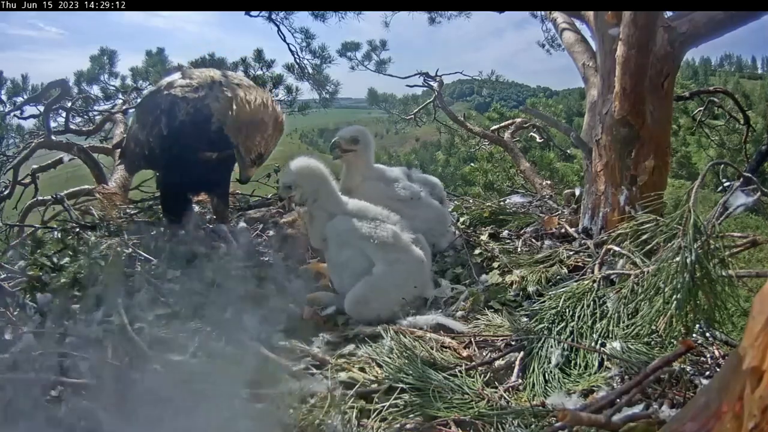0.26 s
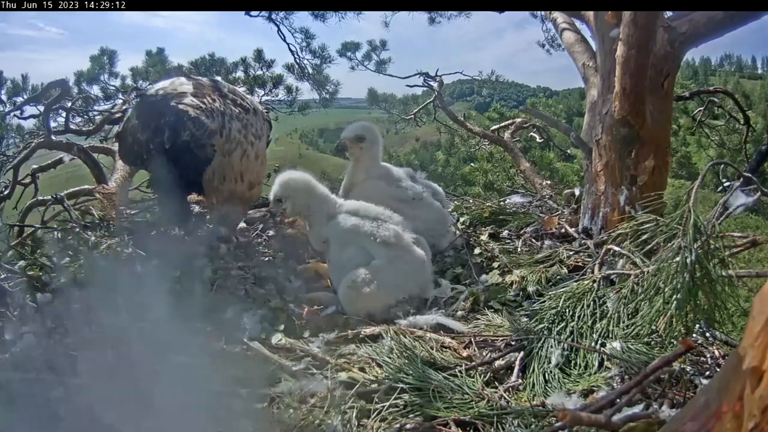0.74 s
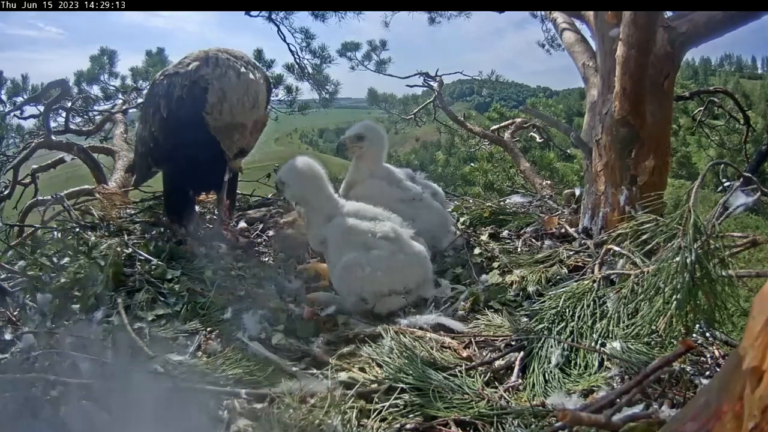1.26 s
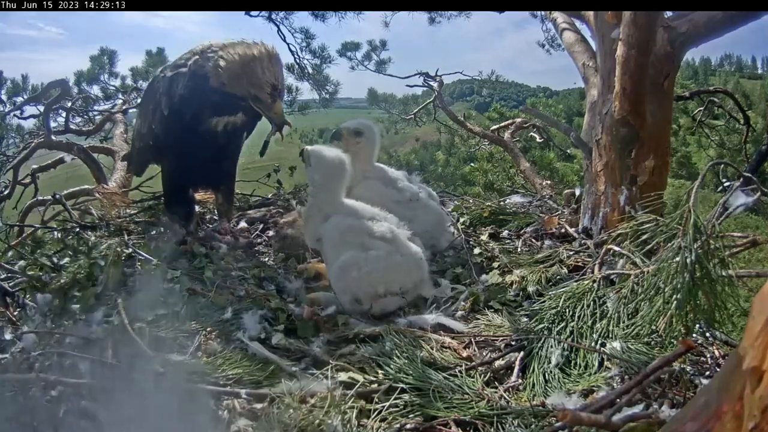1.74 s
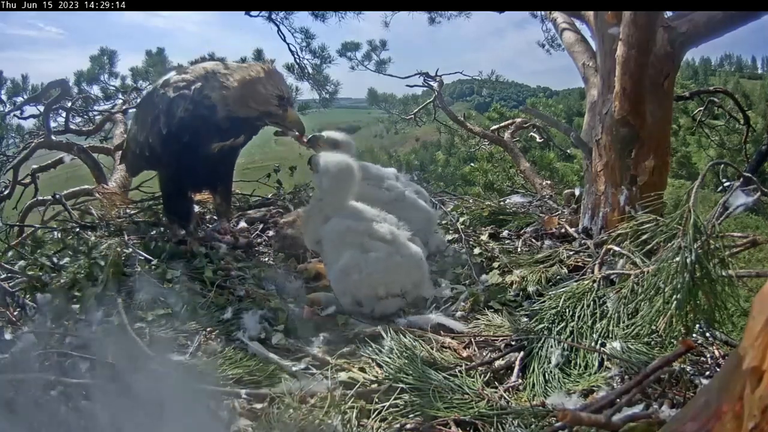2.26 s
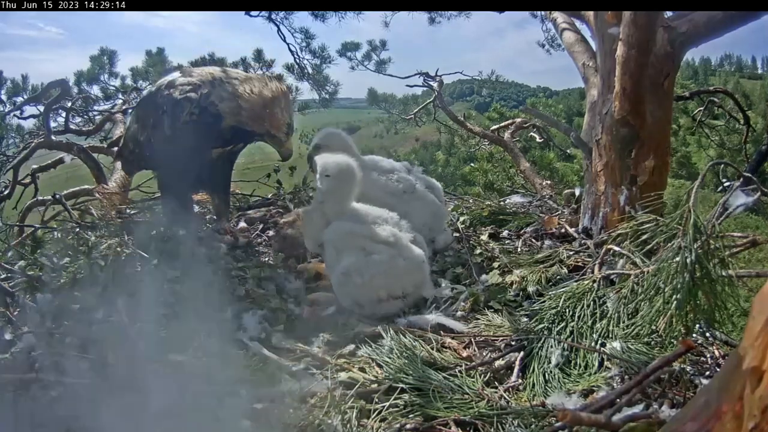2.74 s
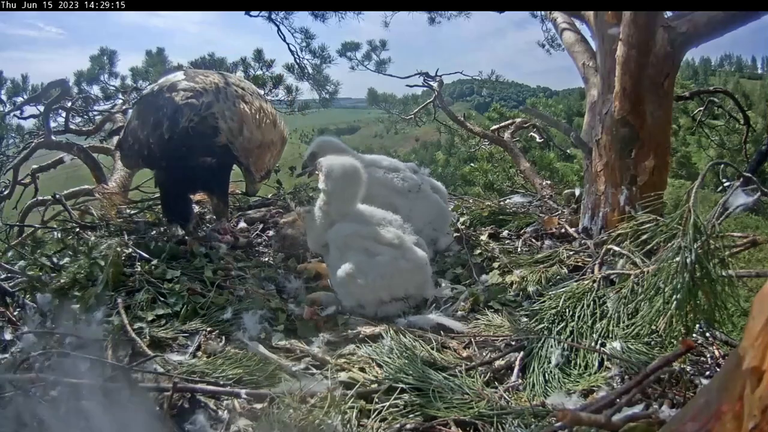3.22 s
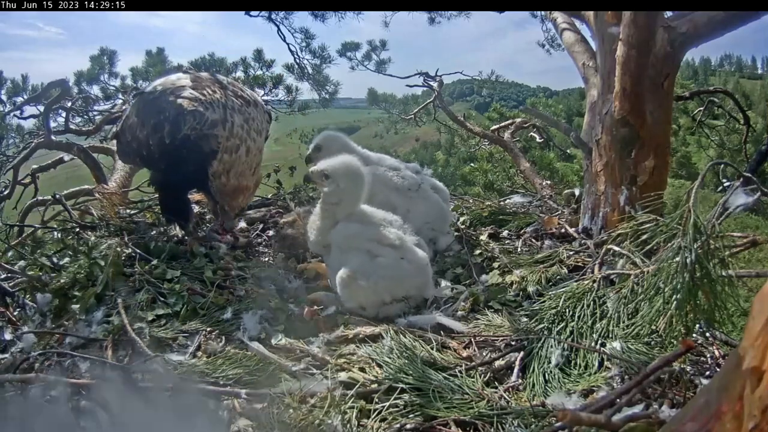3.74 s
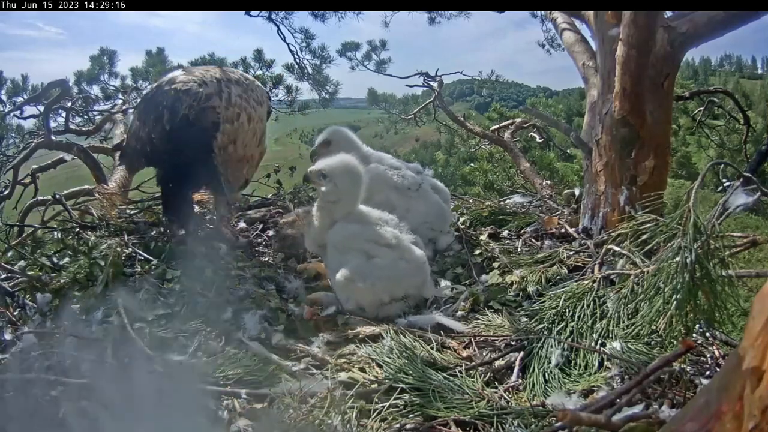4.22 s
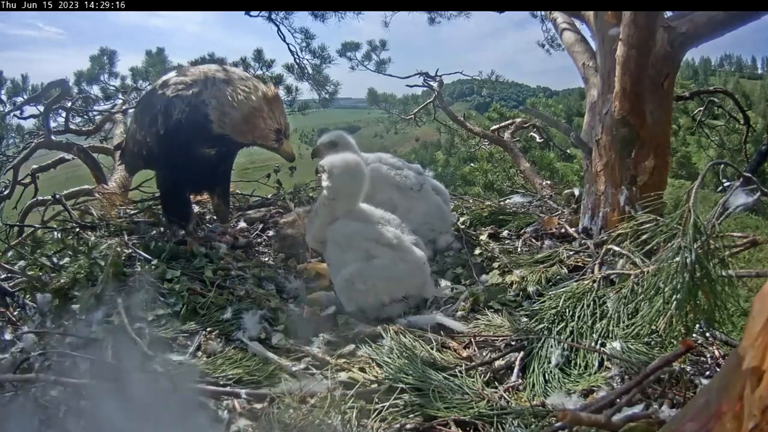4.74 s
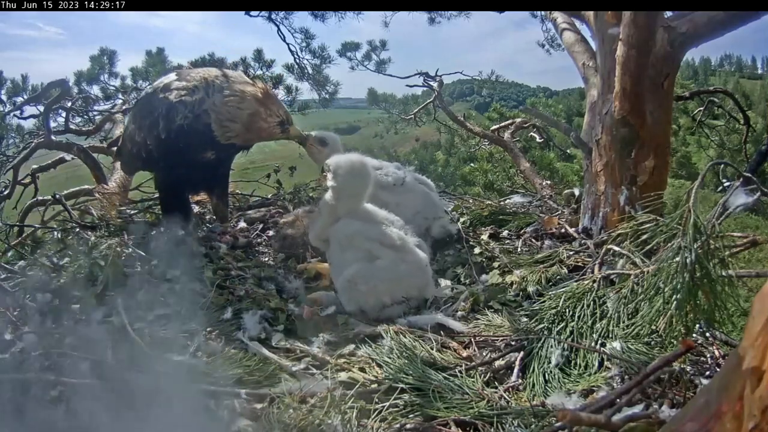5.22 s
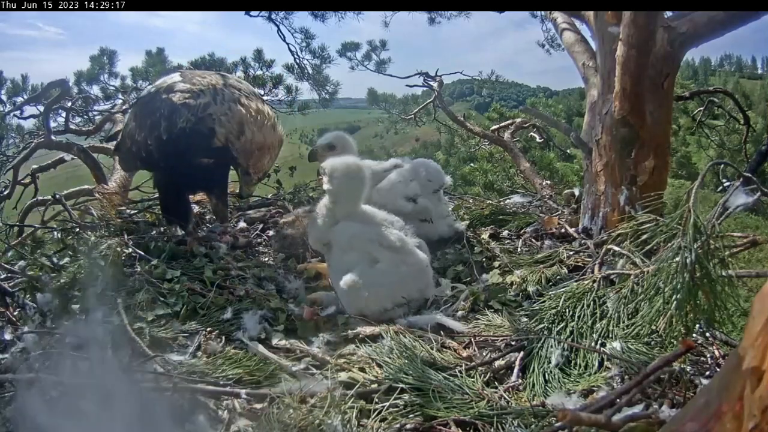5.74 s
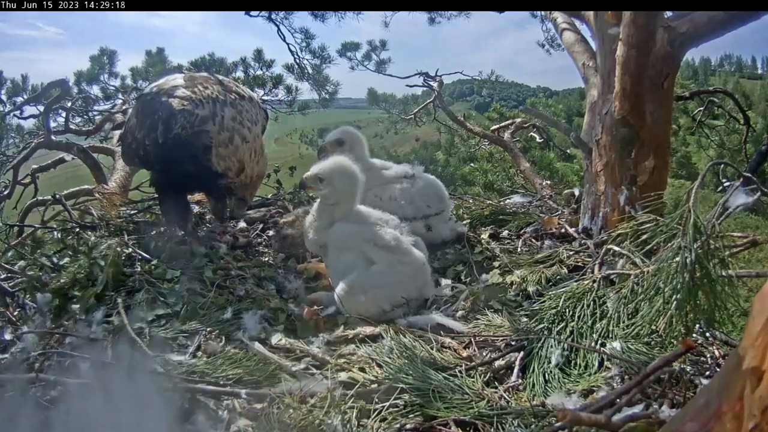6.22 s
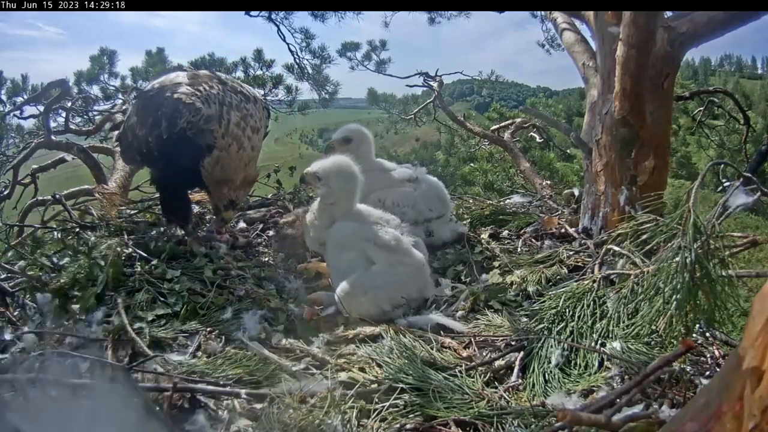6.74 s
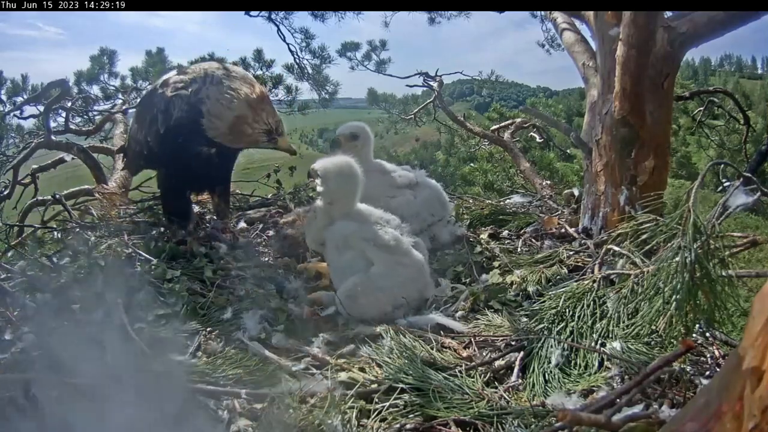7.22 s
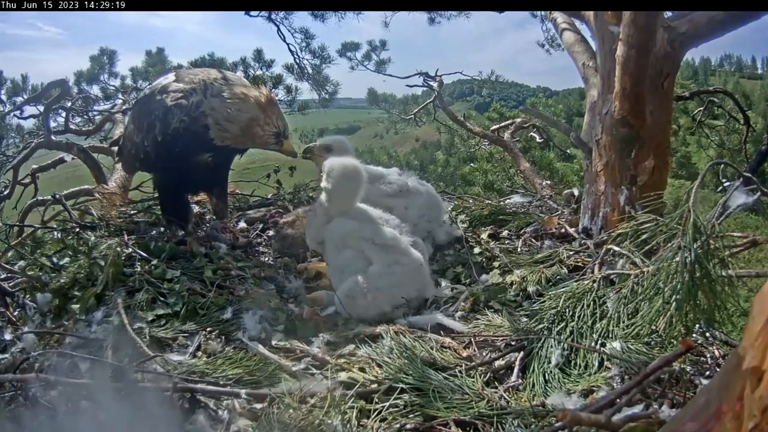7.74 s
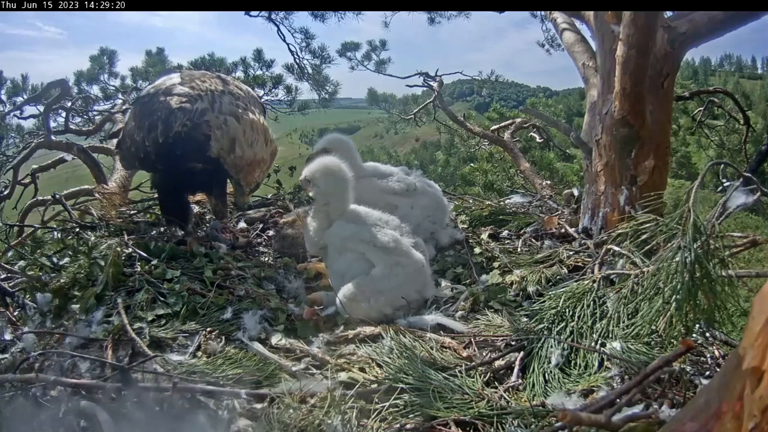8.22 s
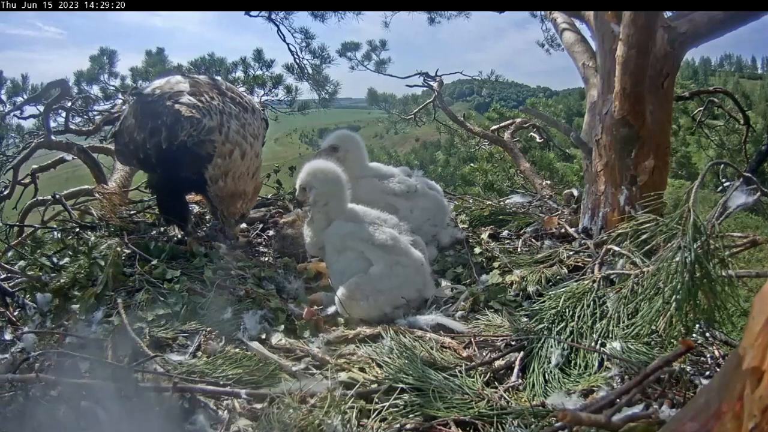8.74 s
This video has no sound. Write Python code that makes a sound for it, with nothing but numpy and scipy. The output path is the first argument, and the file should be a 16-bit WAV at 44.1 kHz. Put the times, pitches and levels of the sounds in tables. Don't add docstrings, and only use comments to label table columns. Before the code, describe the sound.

Downy raptor chicks whistle thin gliding chirps in a treetop nest, loudest near the start, over steady low wind rumble and soft hiss.

```python
import sys
import numpy as np
from scipy import signal
from scipy.fft import rfft, irfft, next_fast_len
from scipy.io import wavfile
from scipy.ndimage import uniform_filter1d, map_coordinates

SR = 44100
rng = np.random.default_rng(int(sys.argv[2]) if len(sys.argv) > 2 else 0)


def int16_out(signal):
    q = np.round(np.clip(np.atleast_2d(signal).T, -1, 1) * 32767)
    wavfile.write(sys.argv[1], SR, q.astype(np.int16))


def nominal_scale(level):
    x = np.asarray(level, float) / 20
    return 10 ** x


N = 395577


def unit(x):
    return x / np.sqrt(np.mean(x ** 2) + 1e-20)


def filtered(x, response):
    size = next_fast_len(N + 8192)
    return irfft(rfft(x, size) * response(np.fft.rfftfreq(size, 1 / SR)), size)[:N]


def wobble(rate, size):
    knots = rng.standard_normal(int(size * 900 / SR) + 4)
    return map_coordinates(knots, [np.arange(size) * rate / SR])


def fade(t, edge):
    return np.sin(np.pi / 2 * np.clip(np.minimum(t, t[-1] - t) / edge, 0, 1))


def add(track, s, note):
    track[round(s * SR):][:len(note)] += note


THROAT_HZ = 4150


def whistle(s, hz, db, edge, flutter_db, rasp, throat_db=0):
    t = np.arange(-edge / 2, s[-1] - s[0] + edge / 2, 1 / SR)
    pitch = uniform_filter1d(np.interp(t, s - s[0], hz), size=170, mode="nearest")
    flutter, sway, shake = [wobble(rate, size=8192)[:len(t)] for rate in (170, 900, 900)]
    throat = throat_db * np.exp(-((pitch - THROAT_HZ) / 550) ** 2)
    level = np.interp(t, s - s[0], db) + flutter_db * flutter + throat
    turn = np.exp(2j * np.pi * np.cumsum(pitch) / SR)
    rasp = np.clip(rasp, 0, 1)
    voice = np.sqrt(2 - 2 * rasp) + np.sqrt(rasp) * (sway + 1j * shake)
    return nominal_scale(level) * fade(t - t[0], edge) * (voice * turn).imag


# t/s from the start, f/Hz, level/dB against the peak
PEAKED_SHAPE = [
    (0, 4640, -13),
    (.033, 5050, -8),
    (.06, 5400, -10.5),
    (.08, 6500, -18.5),
    (.102, 4730, 0.5),
    (.121, 4150, -14.5),
]
DOWN_SHAPE = [
    (0, 4860, -7.5),
    (.015, 4650, -4.5),
    (.031, 4330, 2.5),
    (.04, 4000, -4),
    (.05, 3720, -4),
    (.064, 3500, -17.5),
]
UP_SHAPE = [
    (0, 3560, -23),
    (.012, 3704, -4),
    (.02, 3820, 2.5),
    (.03, 4035, -9),
    (.04, 4130, -7),
    (.068, 4050, -25),
]
ARCHED_SHAPE = [
    (0, 2500, -18.5),
    (.026, 3750, -4.5),
    (.035, 3984, -6),
    (.046, 4150, 0),
    (.069, 4050, -11.5),
    (.09, 3855, -2),
    (.108, 3300, -12.5),
    (.127, 2350, -16),
]
# t/s, stretch (ratio), peak level/dB, extra onset level/dB, extra ending level/dB
PEAKED_TIMES = [
    (1.025, .97, -19, 4, 1),
    (1.21, 1.03, -16.5, -6, 1.4),
]
DOWN_TIMES = [
    (1.4, .9, -15, -4, -1.5),
    (1.59, .99, -12.5, -13, -3.5),
    (1.796, .97, -14, 4, -0.5),
]
UP_TIMES = [
    (1.468, 1, -16, 3.5, 11),
    (1.662, 1, -10.5, 0, 3),
    (1.862, 1.03, -10, 1, -8),
]
ARCHED_TIMES = [
    (1.995, .99, -12, -10, -1),
    (2.193, 1.01, -13, 0.5, -2),
]
ONSET_S, ENDING_S = 0.012, 0.03


def begging():
    kinds = (
        (PEAKED_SHAPE, PEAKED_TIMES),
        (DOWN_SHAPE, DOWN_TIMES),
        (UP_SHAPE, UP_TIMES),
        (ARCHED_SHAPE, ARCHED_TIMES),
    )
    for shape, times in kinds:
        t, hz, under_db = np.transpose(shape)
        for s, stretch, db, onset_db, ending_db in times:
            onset = onset_db * np.exp(-t / ONSET_S)
            ending = ending_db * np.exp(-((t[-1] - t) / ENDING_S) ** 2)
            level = db + under_db + onset + ending
            yield s - 0.003, whistle(stretch * t, hz, level, edge=0.0051, flutter_db=2.2, rasp=0.02)


# t/s, length/s, start f/Hz, settled f/Hz, level/dB
HOOK_NOTES = [(0.574, 0.042, 4720, 3600, -29), (0.701, .018, 6780, 6240, -36.5),
              (0.817, .025, 7080, 6520, -35), (.93, .03, 6720, 6450, -32.5),
              (1.182, 0.037, 4570, 3580, -26.5), (2.419, 0.018, 4200, 3640, -27.5),
              (2.488, 0.034, 4520, 3330, -27.5), (2.977, 0.027, 4830, 3570, -25),
              (3.093, .077, 4590, 3520, -27.5), (3.727, 0.064, 5670, 3635, -27.5),
              (4.039, .045, 5580, 4780, -30), (4.377, .027, 5500, 4800, -31),
              (4.703, 0.046, 6030, 3590, -27), (7.555, .042, 5000, 4150, -27.5)]
SETTLE_S, HOOK_SAG_HZ_PER_S = 0.0085, 1000
HOOK_ATTACK_S, HOOK_ATTACK_DB, HOOK_FADE_DB_PER_S = 0.008, 5, 199.5


def hooks():
    for s, length, hz, settled_hz, db in HOOK_NOTES:
        t = np.linspace(0, length, num=16)
        level = db - HOOK_ATTACK_DB * np.exp(-t / HOOK_ATTACK_S) - HOOK_FADE_DB_PER_S * t
        drop = (hz - settled_hz) * np.exp(-(t / SETTLE_S) ** 1.2)
        pitch = settled_hz + drop - HOOK_SAG_HZ_PER_S * t
        yield s - 0.003, whistle(t, pitch, level + 0.5, edge=0.005, flutter_db=3.5, rasp=0.066, throat_db=4)


ALONG = np.linspace(0, 1, num=16)

# t/s, length/s, start f/Hz, level/dB
FALL_NOTES = [
    (0.906, 0.017, 4860, -31),
    (2.812, .015, 4590, -26.5),
    (3.407, .015, 5600, -28),
    (3.565, 0.011, 4280, -28),
    (4.09, .02, 4820, -30),
    (4.429, 0.014, 4540, -29),
    (5.022, .0085, 5430, -26.5),
    (5.35, 0.0127, 5400, -32),
    (7.883, .017, 4200, -33.5),
]
REST_HZ = 3560


def falls():
    for s, length, hz, db in FALL_NOTES:
        yield s, length, hz + (REST_HZ - hz) * ALONG, db, 0.07


# t/s, length/s, start f/Hz, end f/Hz, level/dB
GLIDE_NOTES = [(0.864, 0.019, 4950, 5260, -32), (1.36, .035, 3870, 3600, -31),
               (2.847, .036, 4160, 3950, -28), (4.155, 0.026, 4100, 3830, -27),
               (2.114, 0.019, 5500, 4810, -27.5), (2.305, .025, 4400, 3920, -24.5),
               (2.34, .03, 5730, 4760, -33), (3.002, 0.027, 3600, 4430, -31),
               (3.196, .025, 3600, 4330, -29.5), (3.399, 0.016, 3600, 4300, -30),
               (3.582, 0.021, 3710, 4400, -33), (4.53, .027, 3740, 4140, -32),
               (4.806, 0.044, 3610, 4290, -31.5), (5.108, .016, 3650, 3970, -34),
               (6.445, 0.018, 4650, 3940, -26), (6.602, .011, 4010, 4350, -23),
               (6.688, 0.02, 3450, 3250, -29.5), (6.85, .013, 4350, 5900, -32),
               (6.865, .018, 5840, 4270, -25), (6.889, 0.01, 4440, 4000, -23.5),
               (6.911, .023, 4000, 4500, -21), (6.998, 0.0071, 4350, 3900, -23),
               (7.956, .016, 3950, 4200, -26), (8.169, .042, 2650, 1660, -33)]


def glides():
    for s, length, hz, end_hz, db in GLIDE_NOTES:
        yield s, length, hz + (end_hz - hz) * ALONG, db, 0.1


# t/s, length/s, middle f/Hz, level/dB
PEEP_NOTES = [(.975, 0.02, 4030, -35), (1.295, 0.027, 3686, -30.5), (1.448, .02, 3580, -26),
              (1.94, 0.06, 3970, -35), (2.062, .013, 5000, -33), (2.152, 0.029, 4150, -25),
              (2.388, .014, 3710, -28), (2.443, .013, 4800, -32), (2.445, .015, 3370, -27),
              (2.56, .015, 3950, -31), (2.579, 0.014, 4050, -33), (2.676, 0.015, 3764, -25.5),
              (2.72, 0.013, 5020, -31), (2.764, 0.036, 4980, -35.5), (2.955, 0.018, 4250, -29.5),
              (3.108, 0.017, 4020, -30), (4.495, 0.014, 3960, -28), (5.842, 0.013, 3670, -31.5),
              (6.402, 0.011, 3980, -31.5), (6.54, .03, 3450, -31), (7.009, .016, 3300, -29),
              (7.165, 0.016, 4370, -31.5), (7.596, .013, 3760, -30), (8.01, 0.013, 3650, -32)]
PEEP_SAG_HZ_PER_S = 3300


def peeps():
    for s, length, hz, db in PEEP_NOTES:
        yield s, length, hz - PEEP_SAG_HZ_PER_S * length * (ALONG - 0.5), db, 0.07


# t/s, length/s, held f/Hz, end f/Hz, level/dB
LOW_NOTES = [(2.398, 0.098, 2996, 2950, -25.5), (2.552, .02, 2930, 2110, -28),
             (2.828, .014, 3150, 3170, -28), (2.995, .095, 2664, 2700, -30.5),
             (3.082, .018, 2400, 1930, -29), (3.655, .022, 2680, 2600, -29.5),
             (3.678, 0.016, 2270, 1940, -25.5), (3.7, 0.012, 1380, 1290, -29),
             (4.285, 0.02, 2760, 2550, -30), (4.313, .015, 2320, 2140, -30), (4.72, .063, 2580, 2630, -38),
             (4.922, 0.026, 2540, 2450, -29), (5.335, .027, 2520, 2600, -33),
             (5.54, 0.033, 2550, 1860, -31), (6.56, 0.027, 3010, 2960, -31), (6.71, .035, 2840, 2870, -33),
             (6.75, .028, 2500, 2600, -31), (7.026, 0.015, 2820, 2450, -29.5),
             (7.505, .013, 2610, 2550, -33), (8.215, 0.015, 1400, 1270, -31)]
DROOP_POWER = 1.9
SCOOP_HZ, SCOOP_S = 205, 0.006


def low_voice():
    for s, length, hz, end_hz, db in LOW_NOTES:
        scoop = SCOOP_HZ * np.exp(-length * ALONG / SCOOP_S)
        pitch = hz + (end_hz - hz) * ALONG ** DROOP_POWER - scoop
        yield s, length, pitch, db, 0.04 + 0.89 * abs(1 - end_hz / hz)


# t/s, length/s, middle f/Hz, level/dB
HOARSE_NOTES = [
    (2.654, 0.019, 4250, -26),
    (3.292, .039, 4140, -31.5),
    (3.322, .041, 4220, -32),
    (6.237, 0.036, 4230, -28.5),
    (6.296, .02, 4180, -34.5),
    (6.42, .05, 4500, -29.5),
    (7.316, .04, 4090, -32),
    (7.438, 0.048, 3500, -29),
    (7.715, 0.041, 5500, -34),
    (8.14, 0.023, 4150, -33),
]
HOARSE_SAG_HZ_PER_S = 5000


def hoarse():
    for s, length, hz, db in HOARSE_NOTES:
        yield s, length, hz - HOARSE_SAG_HZ_PER_S * length * (ALONG - 0.5), db, 0.9


CHIRP_SWELL = [-2.5, -1.1, -2]


def chicks():
    track = np.zeros(N + SR)
    for calls in (begging, hooks):
        for s, note in calls():
            add(track, s, note)
    swell = np.interp(ALONG, [0, 1 / 3, 1], CHIRP_SWELL)
    for kind in (falls, glides, peeps, low_voice, hoarse):
        for s, length, hz, db, rasp in kind():
            note = whistle(length * ALONG, hz, db + swell, 0.0089, flutter_db=1.7, rasp=rasp, throat_db=2.5)
            add(track, s - 0.004, note)
    return track[:N]


# t/s, open part/s, closed tail/s, level/dB, beak opening level/dB
CLUCK_NOTES = [
    (.165, 0.016, 0.0043, -31.5, 1),
    (.658, 0.034, 0.039, -29, 7.5),
    (1.25, .035, .018, -31, 11.5),
]
CLUCK_HZ, CLUCK_RISE_DB, CLUCK_SAG_HZ_PER_S = 679.5, 4.5, 700
BREAK_S, BREAK_HZ, CLOSED_DB = 0.0035, 591, -8
LAST_DROP_S, LAST_DROP_HZ = 0.0099, 170


def parent():
    track = np.zeros(N + SR)
    for s, hold, tail, db, open_db in CLUCK_NOTES:
        t = np.arange(0, hold + BREAK_S + tail, 1 / SR)
        shut = np.clip((t - hold) / BREAK_S, 0, 1)
        hz = CLUCK_HZ + shut * (BREAK_HZ - CLUCK_HZ - CLUCK_SAG_HZ_PER_S * (t - hold))
        hz = hz - LAST_DROP_HZ * np.clip(1 - (t[-1] - t) / LAST_DROP_S, 0, 1) ** 2
        level = db - CLUCK_RISE_DB * np.clip(1 - t / (0.95 * hold), 0, 1) + 2.1 * shut
        beak_db = open_db + shut * (CLOSED_DB - open_db - 120 * (t - hold))
        phase = 2 * np.pi * np.cumsum(hz + 5 * wobble(150, size=len(t))) / SR
        partials_db = [0.1, 3.0 + 0.39 * beak_db, beak_db + 4.0, 0.51 * beak_db - 8.0]
        stack = sum(nominal_scale(g) * np.sin(k * phase) for k, g in enumerate(partials_db, 1))
        loudness = np.sqrt(2) * nominal_scale(level + 1.2 * wobble(300, size=len(t)))
        add(track, s, loudness * fade(t, 0.0072) * stack)
    return track[:N]


# t/s, f/Hz, level/dB, time to fall 60 dB/s
THUMP_NOTES = [
    (1.686, 252.4, -10, 0.16),
    (1.705, 356, -11, 0.095),
    (1.728, 247, -21, 0.24),
    (1.896, 260, -11.5, 0.11),
    (7.137, 330, -10.5, 0.068),
]


def nest():
    track, twigs = np.zeros(N + SR), np.zeros(N + SR)
    t = np.arange(SR // 4) / SR
    for s, hz, db, t60 in THUMP_NOTES:
        blow = nominal_scale(db - 60 * t / t60) * (1 - np.exp(-t / 0.0034))
        add(track, s, blow * np.sin(2 * np.pi * hz * t))
        add(twigs, s, blow * rng.standard_normal(len(t)))

    def dull(f):
        return 1 / (1 + (f / 900) ** 4) / (1 + (450 / (f + 1)) ** 4)

    return track[:N] + nominal_scale(4) * filtered(twigs[:N], dull)


# delay t/s, level/dB
BOUGH_ECHOES = [
    (.0031, -16),
    (.0072, -14),
    (0.0116, -19),
]


def tree(x):
    t = np.arange(SR // 4) / SR
    scatter = rng.standard_normal(len(t)) * nominal_scale(-60 * t / 0.37) * (t > 0.004)
    answer = nominal_scale(-10.5) * scatter / np.linalg.norm(scatter)
    for delay, db in BOUGH_ECHOES:
        answer[round(delay * SR)] += nominal_scale(db)
    return x + signal.fftconvolve(x, answer)[:N]


# f/Hz, level/dB per Hz
WIND_SPECTRUM = [(15, -65.5), (25, -41.5), (42, -25), (52, -15.5), (93, 4), (178, -4), (261, 0.5),
                 (509, -16), (647, -18.5), (783, -18.5), (948, -17.5), (1900, -19), (6740, -24.5),
                 (7600, -32.5), (9880, -61), (16700, -120)]


def rush(share, patchy_db):
    z = signal.stft(rng.standard_normal(N), nperseg=512)[2]
    patches = uniform_filter1d(rng.standard_normal(z.shape), size=5, axis=0)
    patches = uniform_filter1d(patches, size=8, axis=1)
    noise = signal.istft(z * nominal_scale(patchy_db * unit(patches)), nperseg=512)[1][:N]
    f, db = np.transpose(WIND_SPECTRUM)

    def colour(hz):
        level = np.interp(np.log(np.clip(hz, 1, 7550)), np.log(f), db)
        return nominal_scale(level) * np.sqrt(share(hz))

    return unit(filtered(noise, colour))


SPLIT_HZ = 554
RUMBLE_DB, HISS_DB, HISS_EASES_DB_PER_S = -24, -26.5, 0.0558


def wind():
    t = np.arange(N) / SR

    def low(hz):
        return 1 / (1 + (hz / SPLIT_HZ) ** 8)

    raw = rush(low, patchy_db=-0.4)
    gusts = abs(signal.hilbert(raw, next_fast_len(N))[:N])
    evened = raw / (0.3 + gusts) ** 0.24
    rumble = nominal_scale(RUMBLE_DB) * unit(filtered(evened, lambda hz: 1 / (1 + (38 / (hz + 1)) ** 4)))
    hiss_db = HISS_DB - HISS_EASES_DB_PER_S * t + 0.33 * wobble(3.15, size=N)
    return rumble + nominal_scale(hiss_db) * rush(lambda hz: 1 - low(hz), patchy_db=0.52)


PARENT_ECHO_SHARE = 0.3


def scene():
    young, adult = chicks(), parent()
    echoed = tree(young + PARENT_ECHO_SHARE * adult)
    mono = echoed + (1 - PARENT_ECHO_SHARE) * adult + nest() + wind()
    return np.array([mono, mono])


# t/s, from f/Hz, to f/Hz
EMPTY_BANDS = [
    (2.01, 5050, 5600),
    (2.01, 5850, 6050),
    (2.01, 6350, 6750),
    (1.11, 6750, 6950),
    (1.31, 7400, 7800),
]
FRAME = 2822


def thin_treble(x):
    lead = 1690
    shape = dict(fs=SR, window="cosine", nperseg=2 * FRAME, noverlap=FRAME)
    hz, t, z = signal.stft(np.pad(x, (lead, 0)), **shape)
    busy = np.sum(abs(z[hz > 2500]) ** 2, axis=0)
    thrift = np.clip((hz[:, None] - 4300) / 2600, 0, 1) * (busy / np.median(busy)) ** 0.2
    keep = abs(z) > 0.75 * thrift * np.median(abs(z), axis=1, keepdims=True)
    thin = rng.random((len(hz) // 7 + 1, len(t))).repeat(7, axis=0)[:len(hz)]
    keep &= thin > 0.14 * thrift ** 2
    for s, from_hz, to_hz in EMPTY_BANDS:
        frame = np.argmin(abs(t - lead / SR - s))
        keep[:, frame] &= (hz < from_hz) | (hz > to_hz)
    return signal.istft(z * keep, **shape)[1][lead:lead + N]


def top_cut(x):
    return signal.sosfilt(signal.butter(12, 7900, fs=SR, output="sos"), x)


TOP_HZ = 7583


def record(dry):
    rounded = dry[0] / (1 + abs(dry[0] / 0.68) ** 4) ** (1 / 4)
    narrow = filtered(thin_treble(rounded), lambda f: 1 / (1 + (f / TOP_HZ) ** 70))
    return top_cut(np.array([narrow, narrow]))


dry = scene()
out = record(dry)
int16_out(out)
```